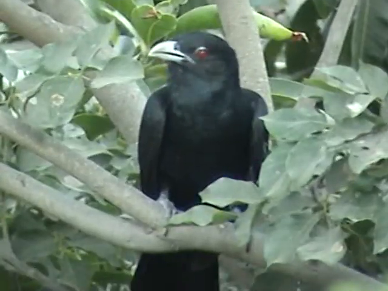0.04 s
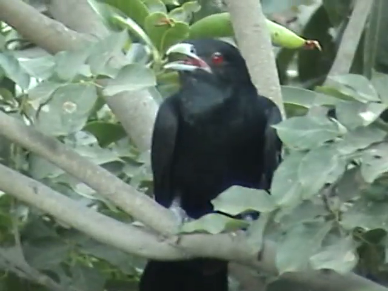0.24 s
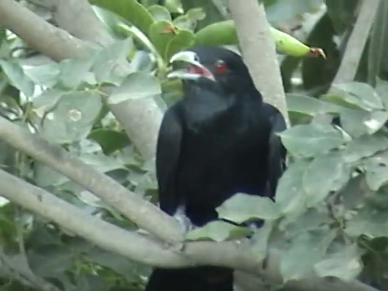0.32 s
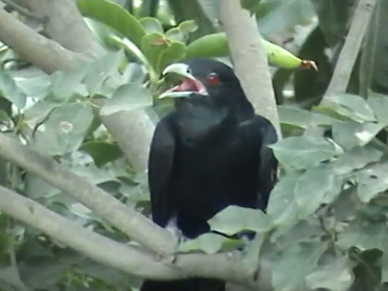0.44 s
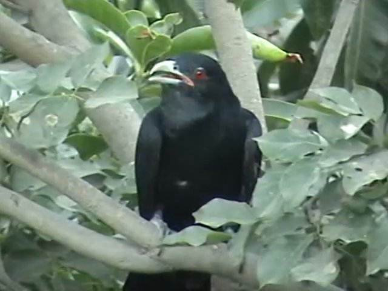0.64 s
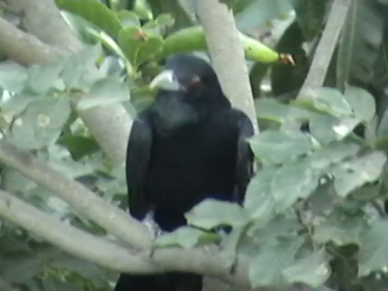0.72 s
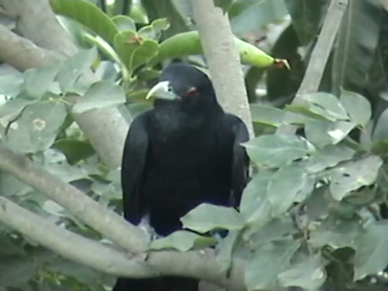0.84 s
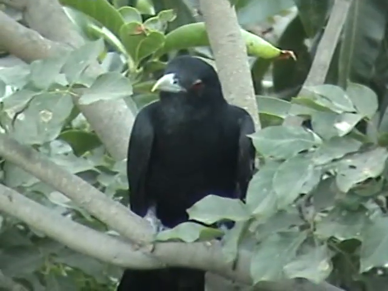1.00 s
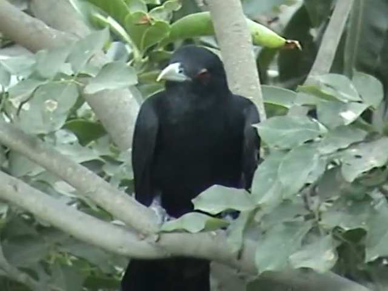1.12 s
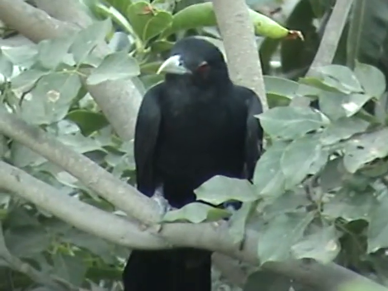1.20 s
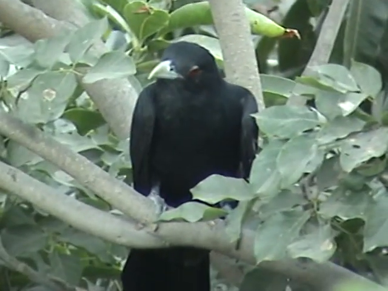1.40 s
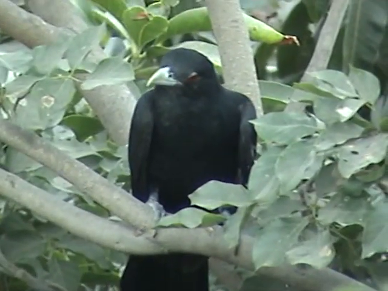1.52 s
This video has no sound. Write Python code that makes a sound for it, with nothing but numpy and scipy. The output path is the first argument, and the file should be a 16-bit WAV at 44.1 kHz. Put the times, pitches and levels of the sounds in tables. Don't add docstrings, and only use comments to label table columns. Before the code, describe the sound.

A cuckoo-like bird gives one loud, clear whistle from about 0.2 to 0.83 seconds: a soft start, rising to its loudest and highest near 0.55-0.6, then falling fast, with thin bright overtones. Leaves and walls scatter a fading echo. Steady low traffic hum and light wind rumble lie beneath; a faint distant horn sounds around 0.45-1.0, dull knocks near 0.7-0.8, tiny leaf ticks after 1.1, and tyre hiss swells towards 1.45.

```python
import sys
import numpy as np
from scipy import signal
from scipy.io import wavfile
from scipy.ndimage import uniform_filter1d

SR = 44100
rng = np.random.default_rng(int(sys.argv[2]) if len(sys.argv) > 2 else 0)


def file_out(sig):
    cols = np.atleast_2d(sig).T
    lim = np.clip(cols, -1, 1)
    pcm = np.round(lim * 32767).astype(np.int16)
    wavfile.write(sys.argv[1], SR, pcm)


def nominal_scale(level):
    x = np.asarray(level, float) / 20
    return 10 ** x


N = 68355

# frequency in Hz, left minus right in dB.
TRAFFIC_PAN = [(300, 0), (600, 0), (1600, -3), (4800, -3), (13000, -2)]


def rms_one(x):
    return x / np.sqrt(np.mean(x ** 2) + 1e-20)


def at_hz(points, hz):
    table_hz, values = np.transpose(points)
    return np.interp(np.log(hz), np.log(table_hz), values)


def glide(s, values, t):
    slope = np.gradient(values, s)
    i = np.clip(np.searchsorted(s, t) - 1, 0, len(s) - 2)
    gap = s[i + 1] - s[i]
    u = np.clip((t - s[i]) / gap, 0, 1)
    step = (values[i + 1] - values[i]) * u * u * (3 - 2 * u)
    bend = gap * u * (1 - u) * (slope[i] * (1 - u) - slope[i + 1] * u)
    return values[i] + step + bend


def drift(rate):
    r = np.exp(-80 * np.pi * rate / SR)
    slow = signal.lfilter([1], [1, -2 * r, r * r], rng.standard_normal(N // 40 + 2002))[2000:]
    return np.interp(np.arange(N) / 40, np.arange(len(slow)), rms_one(slow))


def fade(t, start, rise):
    return np.sin(np.pi / 2 * np.clip((t - start) / rise, 0, 1)) ** 2


def spread(pan_db):
    return np.array([nominal_scale(pan_db / 2), nominal_scale(-pan_db / 2)])


def left_right(mid, side):
    return mid + side * [[1], [-1]]


def lowpass(x, order, hz):
    return signal.sosfilt(signal.butter(order, hz, fs=SR, output="sos"), x)


def bandpass(x, low_hz, high_hz):
    return signal.sosfilt(signal.butter(2, [low_hz, high_hz], "band", fs=SR, output="sos"), x)


def banded_noise(spectrum, patchy_db, alike_share):
    # frequency in Hz, left-right likeness from 0 to 1.
    likeness = [(40, 1), (180, 1), (540, 0.96), (1600, 0.87), (4800, .83), (13000, 0.74)]
    edges = 27 * 2 ** np.arange(0, 9.6, .5)
    white = rng.standard_normal((2, 2, N + 8000))
    out = 0
    for k, (low, high) in enumerate(zip(edges, edges[1:])):
        mid, side = bandpass(white[k % 2], low, high)[:, -N:]
        hz = np.sqrt(low * high)
        alike = np.clip(alike_share * at_hz(likeness, hz), 0, 1)
        level = nominal_scale(at_hz(spectrum, hz) + patchy_db * drift(6.4))
        gain = level * spread(at_hz(TRAFFIC_PAN, hz))[:, None]
        out = out + gain * left_right(np.sqrt(1 + alike) * mid, np.sqrt(1 - alike) * side)
    return rms_one(out)


def bird(t):
    # time in seconds, pitch in Hz, whistle level in dB, overtones in dB, beak opening 0-1.
    call_path = [
        (0.215, 1348, -26, -3, 0.1),
        (0.278, 1308, -22.5, -2, 0.35),
        (.37, 1350, -20, -3.5, 0.74),
        (.45, 1429, -15, -3.5, 0.99),
        (.53, 1589, -11.5, -2, 0.87),
        (0.589, 1657, -11.5, 2, 0.86),
        (.64, 1541, -15, -1.5, 0.92),
        (.72, 1203, -18, -12, 0.71),
        (0.826, 819, -38.5, -30, 0),
    ]
    # centre in Hz, width in Hz, boost in dB.
    throat = [(3276, 600, 12), (3910, 2170, -26.5), (5804, 540, 26.5), (6420, 1360, 21), (8115, 1360, 26),
              (9660, 340, -7.5), (10735, 1380, 18), (12400, 530, 10), (13250, 270, 16), (14400, 820, 22)]
    # rms in dB with the beak nearly shut, rms in dB wide open.
    overtones = [(-34.5, -32), (-34.5, -25.5), (-43.5, -62), (-90, -46), (-68, -58.5), (-57.5, -49.5),
                 (-55, -72), (-71, -55.5), (-65, -57), (-54, -57)]
    # frequency in Hz, left minus right in dB.
    bird_pan = [(1300, -2), (1650, -2.7), (3000, -3.5), (5500, -5.5), (8000, -1.6), (10500, -2), (13500, 9)]
    onset_s, attack_s, end_s, release_s = .192, 0.018, .83, 0.025
    scoop_hz, scoop_s, wobble_hz = 400, .0085, 1.4
    flutter_db, flutter_per_s, overtone_lag_s = 1.6, 15, 0.0068
    breath_db, breath_s = -32, 0.024
    husk_db, husk_rate, husk_db_per_fall = -20, 320, 2.2

    s, hz, level_db, overtones_db, opening = np.transpose(call_path)
    smooth_pitch = glide(s, hz, t)
    since_onset = np.clip(t - onset_s, 0, 1)
    pitch = smooth_pitch - scoop_hz * np.exp(-since_onset / scoop_s) + wobble_hz * drift(36)
    phase = 2 * np.pi * np.cumsum(pitch) / SR
    opening = np.interp(t, s, opening)
    out = nominal_scale(glide(s, level_db, t)) * np.sin(phase) * spread(at_hz(bird_pan, pitch))

    fall = np.clip(-np.gradient(smooth_pitch) * SR / 1000, 0, 5)
    husk = nominal_scale(husk_db + husk_db_per_fall * fall)
    for k, (shut_db, open_db) in enumerate(overtones, 2):
        throat_db = 0
        for centre_hz, width_hz, boost_db in throat:
            throat_db = throat_db + boost_db / (1 + (2 * (k * pitch - centre_hz) / width_hz) ** 2)
        db = shut_db + opening * (open_db - shut_db) + throat_db + np.interp(t, s, overtones_db)
        db = db + flutter_db * drift(flutter_per_s)
        breath = nominal_scale(breath_db - 2.8 * k) * np.exp(-since_onset / breath_s) * drift(250)
        rise = fade(t, onset_s, attack_s + (k - 2) * overtone_lag_s)
        height = nominal_scale(db) * rise * (1 + husk * drift(husk_rate)) + breath
        tone = np.sin(k * phase + rng.uniform(0, 2 * np.pi))
        out += height * tone * spread(at_hz(bird_pan, k * pitch))
    return np.sqrt(2) * out * fade(t, onset_s, attack_s) * (1 - fade(t, end_s - release_s, release_s))


def garden(call, t):
    # delay in seconds, left level in dB, right level in dB.
    echoes = [
        (.0074, -39, -34),
        (.0094, -16, -17),
        (.016, -39, -22),
        (.031, -35, -20),
        (.098, -45, -44),
    ]
    cut_hz, alike = 3400, 0.84
    mono = call.mean(axis=0)
    mid, side = rng.standard_normal((2, N))
    noise = left_right(np.sqrt(1 + alike) * mid, np.sqrt(1 - alike) * side) * fade(t, 0, 0.004)
    low = lowpass(noise, 4, cut_hz)
    answer = 0
    # noise, level in dB, seconds to fall by 60 dB.
    for part, db, t60 in (low, -8.5, 1), (noise - low, -7.5, .27):
        unit_energy = np.sqrt(np.log(1000) / (t60 * SR))
        answer = answer + part * nominal_scale(db - 60 * t / t60) * unit_energy
    out = signal.fftconvolve(mono[None], answer, axes=1)[:, :N]
    near = lowpass(mono, 2, cut_hz)
    for s, left_db, right_db in echoes:
        out += np.array([[nominal_scale(left_db)], [nominal_scale(right_db)]]) * np.interp(t - s, t, near, left=0)
    return out


def rustles(t):
    # centre in seconds, length in seconds, level in dB, lowest Hz, highest Hz.
    puffs = [
        (0.723, .03, -31.5, 320, 900),
        (0.793, .02, -35, 547, 1010),
        (1.078, 0.014, -55.5, 8000, 12300),
        (1.159, .009, -52.5, 4780, 6400),
        (1.16, .008, -54.5, 8000, 13560),
        (1.296, 0.0069, -71, 9000, 13500),
        (1.378, .015, -61, 9000, 13800),
        (1.487, .006, -60, 9000, 12000),
    ]
    out = 0
    for s, length, db, low_hz, high_hz in puffs:
        mid, side = bandpass(rng.standard_normal((2, N)), low_hz, high_hz)
        swell = np.exp(-.5 * ((t - s) / length) ** 2)
        out = out + nominal_scale(db) * swell * rms_one(left_right(mid, 0.16 * side))
    return out


def wind():
    low = lowpass(rng.standard_normal((2, N + 8000)), 3, 70)[:, -N:]
    gust_db = 5 * drift(8.8)
    return nominal_scale(-53 + gust_db) * rms_one(low)


def horn(t):
    # frequency in Hz, rms in dB, width in Hz.
    partials = [(2457, -42.5, 60), (3135, -49.5, 49), (3520, -55.5, 51), (2895, -48, 120)]
    start_s, length_s, edge_s, fade_db_per_s = 0.437, 0.47, 0.042, 3.5
    out = 0
    for hz, db, width_hz in partials:
        mid, side = bandpass(rng.standard_normal((2, N)), hz - width_hz / 2, hz + width_hz / 2)
        blurred = rms_one(left_right(mid, 0.28 * side))
        out = out + nominal_scale(db) * blurred * spread(at_hz(TRAFFIC_PAN, hz))[:, None]
    blast = fade(t, start_s, edge_s) * (1 - fade(t, start_s + length_s, 3 * edge_s))
    return out * nominal_scale(-fade_db_per_s * (t - start_s)) * blast


def passing_vehicle(t):
    # frequency in Hz, dB per Hz.
    tyre_hiss = [(1000, -11), (1500, 6.5), (2000, 6.5), (2500, -12), (3000, -22), (3600, -40)]
    # time in seconds, level in dB.
    approach = [
        (.6, -53.5),
        (1.12, -44),
        (1.19, -37.5),
        (1.3, -36),
        (1.45, -35),
        (1.55, -39.5),
    ]
    spectrum = [(500, -33)] + tyre_hiss + [(5000, -37)]
    level = nominal_scale(np.interp(t, *np.transpose(approach)))
    return level * banded_noise(spectrum, patchy_db=.6, alike_share=0.96)


def traffic():
    # frequency in Hz, level in dB.
    hum = [(18, -45), (30, -13.5), (69, -5.5), (110, -8.5), (138, -5.5), (443, -4.5), (529, -9),
           (1290, -14), (13000, -51)]
    return nominal_scale(-29.5) * banded_noise(hum, patchy_db=1.32, alike_share=1)


def scene():
    t = np.arange(N) / SR
    call = bird(t)
    near = call + garden(call, t) + rustles(t) + wind()
    return near + horn(t) + passing_vehicle(t) + traffic()


def drop_masked_bands(x):
    # frequency in Hz, mid in dB, side in dB.
    mask = [(2500, -62, -52), (3970, -65, -48.5), (8000, -53, -43.5), (12000, -56, -48), (15170, -48, -46)]
    top_hz, top_floor_db, jitter_db, bins = 12850, -70.5, 4.5, 11
    hz, _, z = signal.stft([x[0] + x[1], x[0] - x[1]], SR, nperseg=1024)
    edges = np.arange(0, len(hz), bins)
    band_db = 10 * np.log10(np.add.reduceat(abs(z / 2) ** 2, edges, axis=1) + 1e-16)
    centre = hz[edges] + 237
    mask_hz, mid_db, side_db = np.transpose(mask)
    under = np.array([np.interp(centre, mask_hz, db, left=-99) for db in (mid_db, side_db)])[:, :, None]
    judged_db = band_db + jitter_db * rng.standard_normal(band_db.shape)
    heard = judged_db > band_db[0].max(axis=0) + under
    not_faint_top = (band_db[0] > top_floor_db) | (centre < top_hz)[:, None]
    keep = np.repeat(heard & not_faint_top, bins, axis=1)[:, :len(hz)]
    mid, side = signal.istft(z * keep, SR)[1][:, :N] / 2
    return left_right(mid, side)


def band_limit(x):
    return signal.sosfilt(signal.butter(12, 15030, fs=SR, output="sos"), x)


def record(dry):
    knee_db, gain_share, gain_s = -16.5, 0.27, 0.033
    power = uniform_filter1d(np.mean(dry ** 2, axis=0), int(gain_s * SR))
    level_db = 10 * np.log10(power + 1e-12)
    eased = dry * nominal_scale(-gain_share * np.maximum(level_db - knee_db, 0))
    top_cut = signal.cheby2(12, 70, 15100, fs=SR, output="sos")
    mix = signal.sosfilt(top_cut, drop_masked_bands(eased))
    return band_limit(mix)


dry = scene()
out = record(dry)
file_out(out)
```